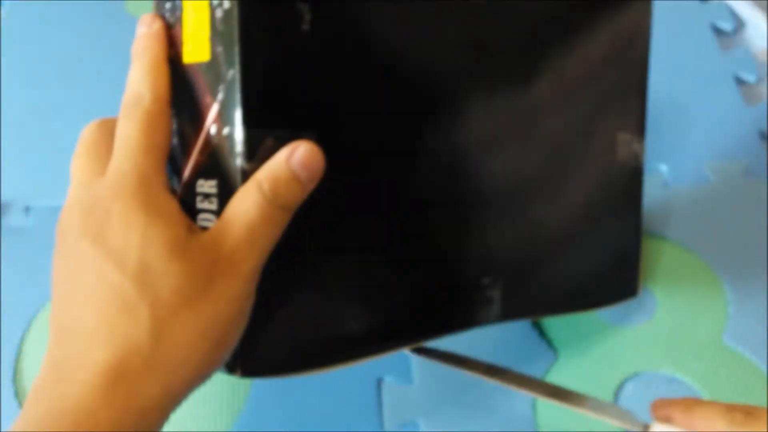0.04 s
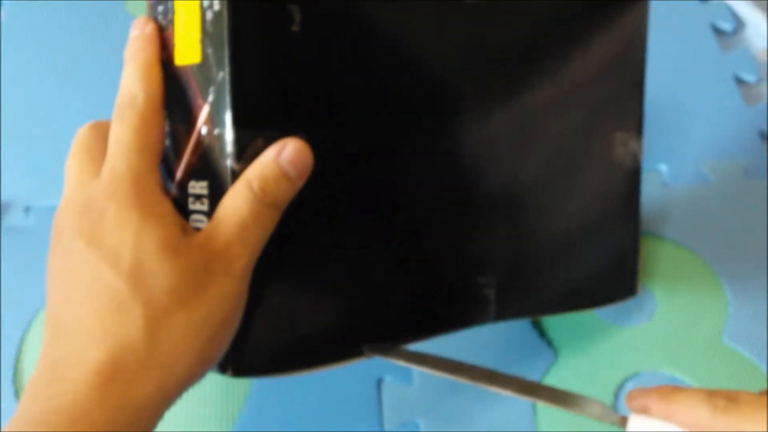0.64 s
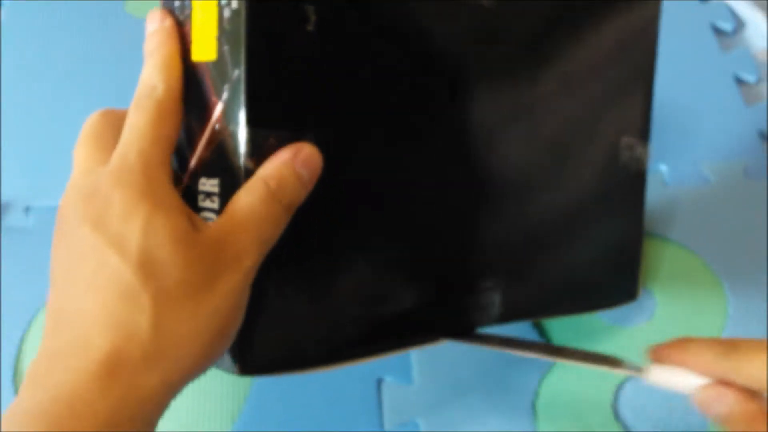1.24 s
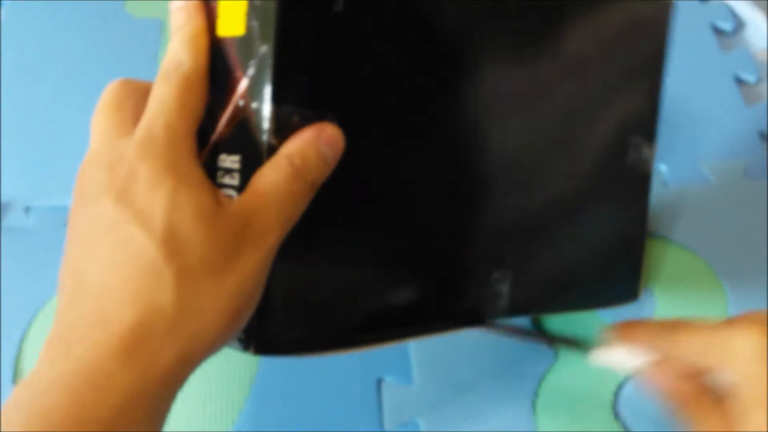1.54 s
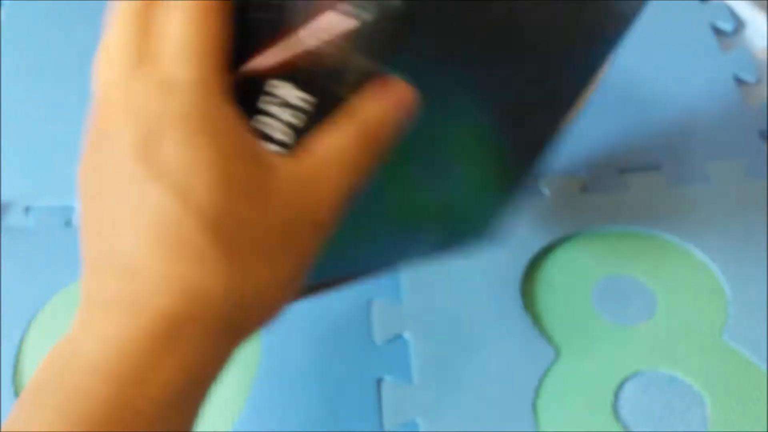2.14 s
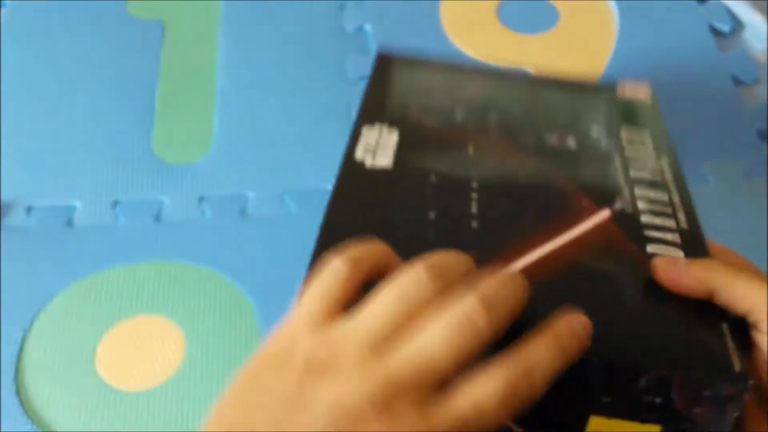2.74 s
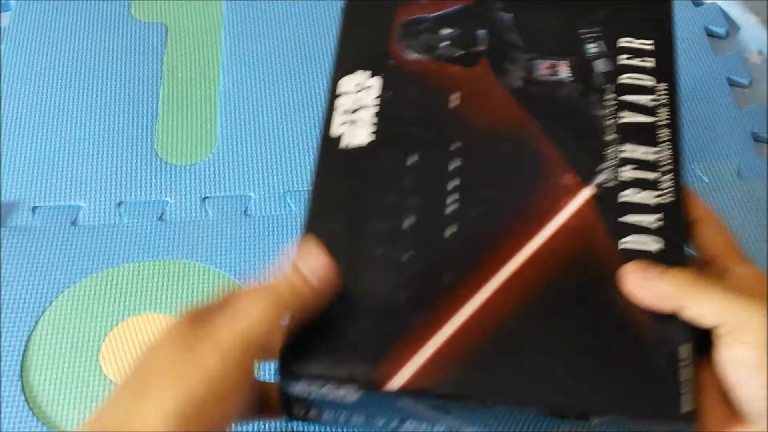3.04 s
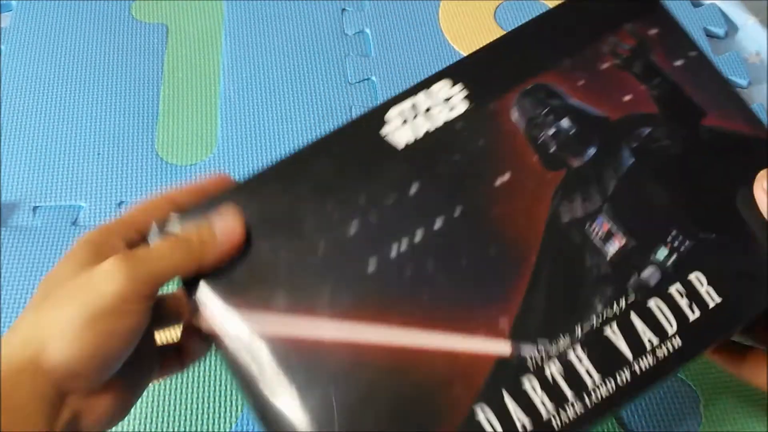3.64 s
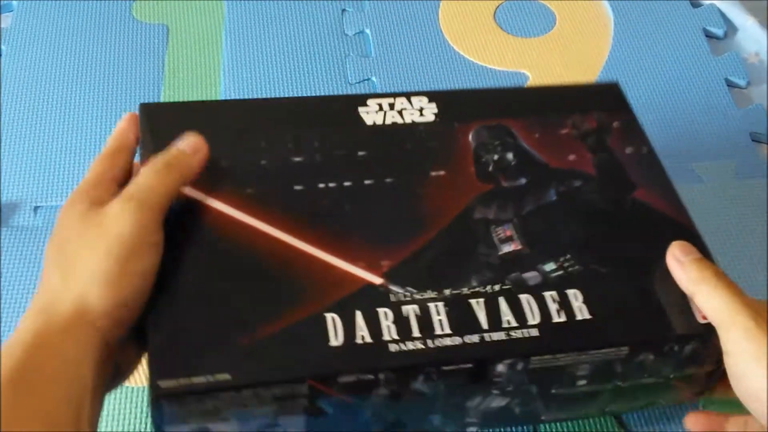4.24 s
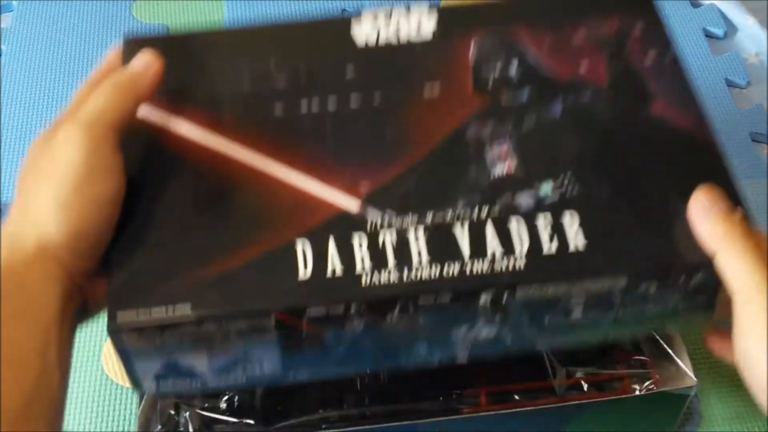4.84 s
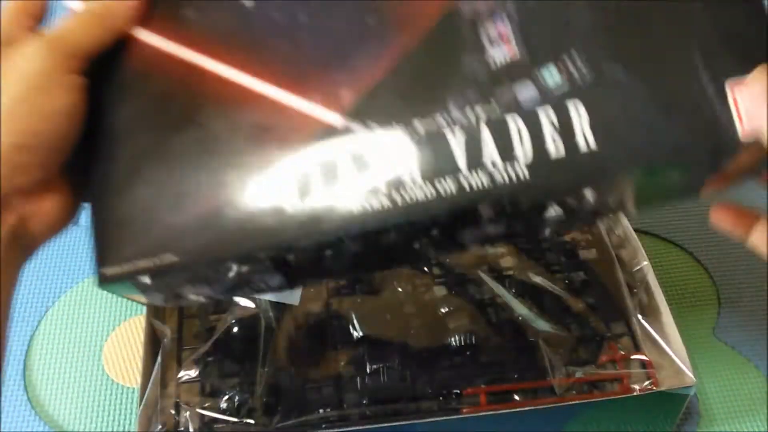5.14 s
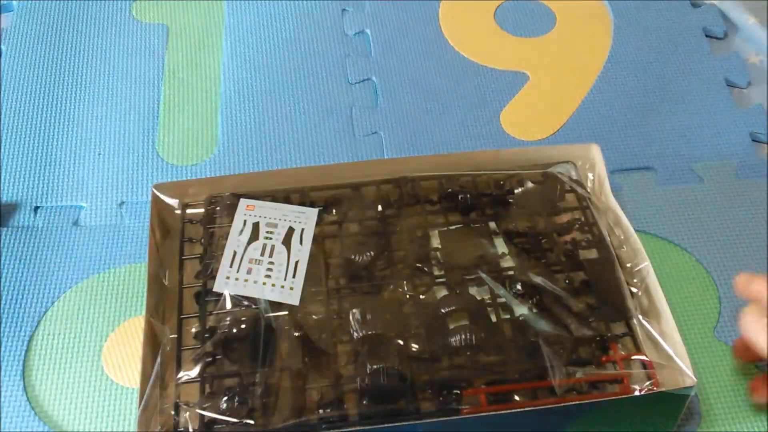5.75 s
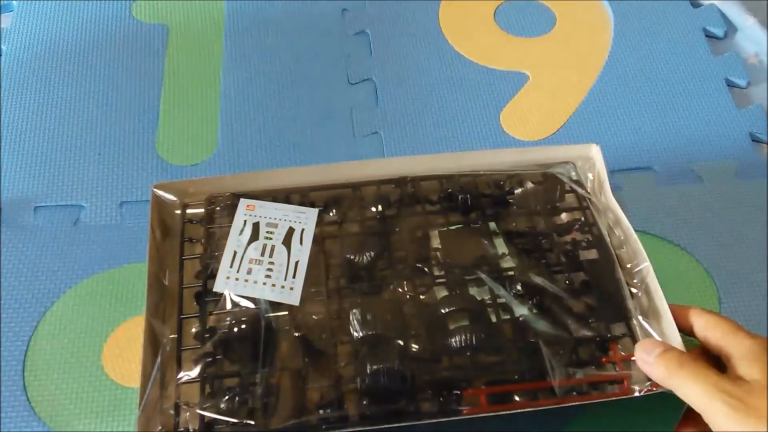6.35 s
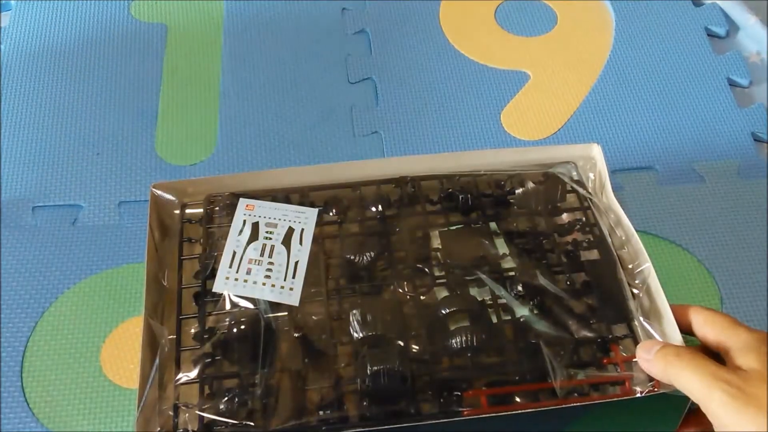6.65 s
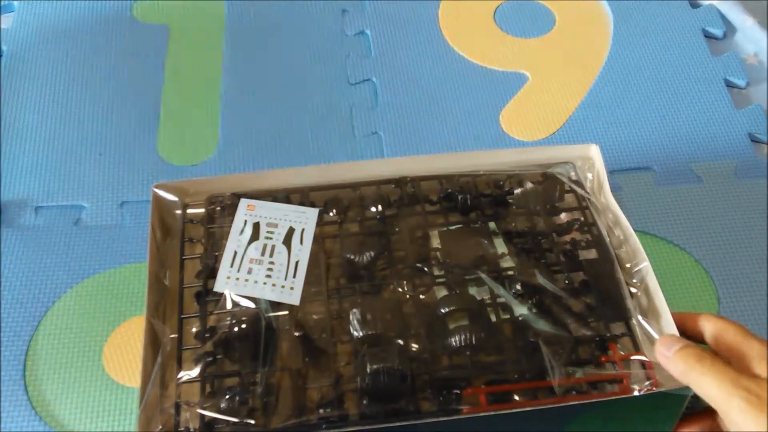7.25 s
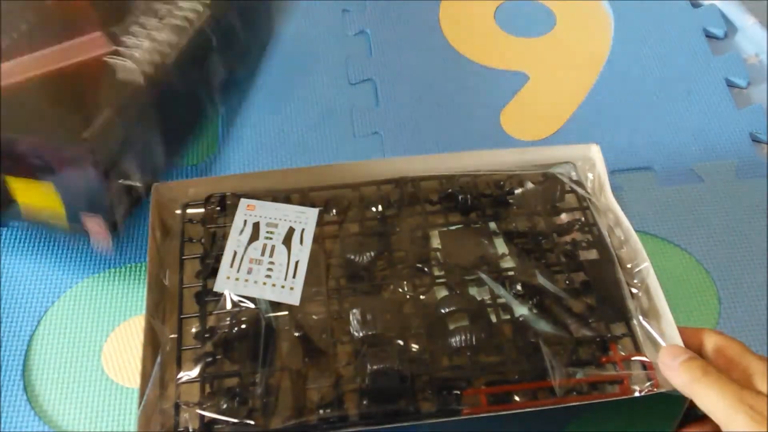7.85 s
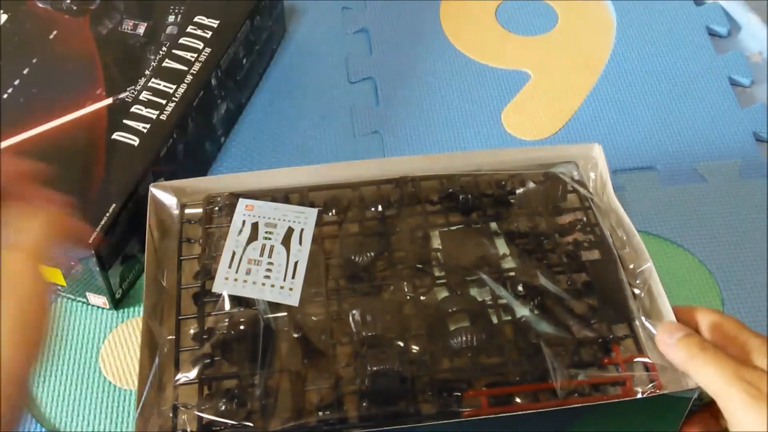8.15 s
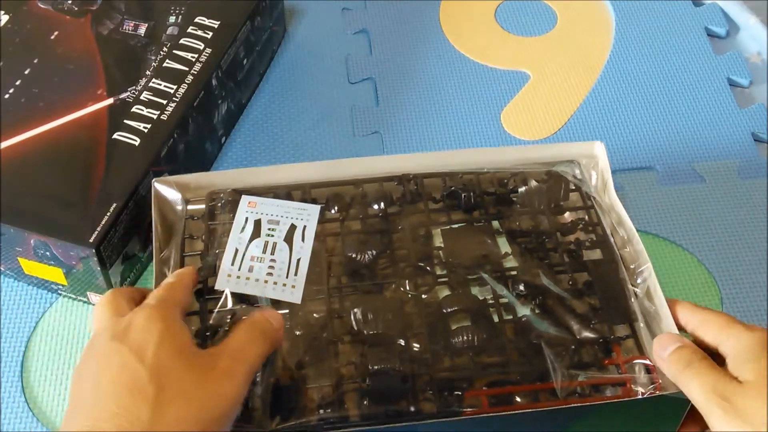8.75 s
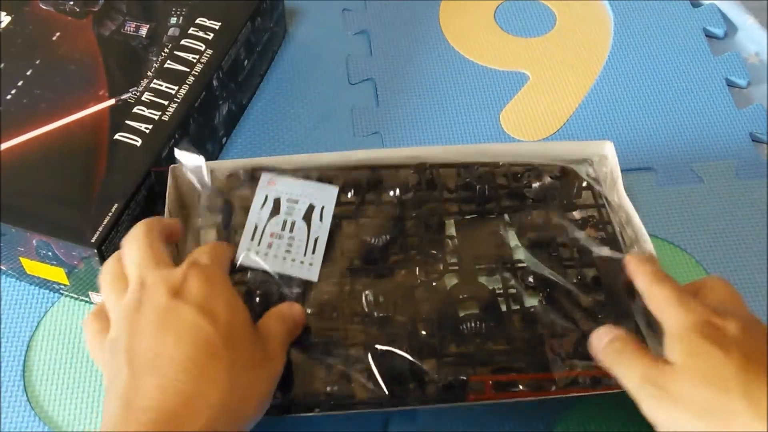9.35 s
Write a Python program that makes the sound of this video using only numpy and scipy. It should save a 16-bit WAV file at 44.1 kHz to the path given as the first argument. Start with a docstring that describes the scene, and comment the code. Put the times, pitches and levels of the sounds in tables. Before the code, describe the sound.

The sounds are close to the microphone in a small room with faint steady background noise. A few light ticks on cardboard open the scene. From about 1 second a knife rasps through the box's seal in short, growing strokes with a faint steely edge, ending in a sharp snap at 1.8 seconds. Between 2 and 4 seconds hands rub and tap the hollow box while turning it, with a firmer knock near 3.8. From 4.3 seconds the tight lid drags up the walls and pops free at about 5. Soft rubs and taps fade into a lull, broken by a few knocks around 7 seconds. Just after 8 seconds the lid topples onto a foam mat with a quick cluster of hollow thuds, the loudest moment. From 8.5 seconds fingers press a thin plastic bag, its dry, bright crackles thickening until about 9.5.

```python
"""Opening a cardboard box

On a foam mat in a small room, close to the microphone, a knife rasps through the seal of a box.
Hands rub and tap the card as they turn it over; the tight lid drags up the walls and pops free.
The lid is set aside and topples with a hollow thud; then fingers press the crackling plastic bag inside.
Rubbing is a stream of tiny slips, knocks are cracks that ring the panels, and the hollow box rings on."""
import sys
import numpy as np
from scipy import signal
from scipy.fft import rfft, irfft
from scipy.io import wavfile
from scipy.ndimage import uniform_filter1d

SR = 44100
rng = np.random.default_rng(int(sys.argv[2]) if len(sys.argv) > 2 else 0)


def to_wav(s):
    """Save 16-bit WAV."""
    ch = np.atleast_2d(s).T  # columns
    pcm = np.round(np.clip(ch, -1, 1) * 32767)  # PCM
    wavfile.write(sys.argv[1], SR, pcm.astype(np.int16))


N = 418509
TIME = np.arange(N) / SR
LEAD_S = 512 / SR  # build-up time allowed before each blow

# Levels are relative. Body is a boost below about 800 Hz, hiss a boost above about 5 kHz.
# Each row: time in seconds, level in dB, body in dB, hiss in dB, rise in ms, resonance in Hz.
CARD_TAPS = [(0.3566, -40.5, -10, 4, 0.35, 4580), (0.5875, -37, 0, -1, 2.3, 620),
             (0.7083, -48.5, 8, -10, 0.5, 340), (0.9503, -51.5, 1.5, -35, 1.2, 676),
             (1.0394, -42.5, 3, -3, .9, 2930), (1.592, -46, -8, 19, 0.17, 1230),
             (1.8008, -21.5, 1, 6.5, .6, 2060), (2.084, -50.5, -5, -17, 0.77, 1440),
             (2.1884, -42.5, -14, -10, 0.48, 1210), (2.2417, -39.5, -8, 4.5, .8, 1710),
             (2.398, -41.5, -6, -4, 0.17, 940), (2.5884, -54, -9, 8, 0.26, 1650),
             (2.8359, -41.5, 0, -8.5, .65, 770), (2.8563, -36.5, 5, -12.5, .25, 720),
             (2.8803, -33, 0.5, 1.5, 0.46, 845), (2.944, -41.5, -15, 8.5, 0.18, 1130),
             (2.9652, -35.5, 2, 10.5, 0.24, 900), (2.9731, -31.5, 8, -3, 2.1, 1890),
             (3.1708, -60.5, -10, 19, .2, 620), (3.2915, -29.5, -12, 1, 0.25, 840),
             (3.3592, -29, -6, -5, 0.25, 630), (3.403, -37.5, -2, -1, 0.26, 870),
             (3.4413, -28.5, -1.5, -4, 2.1, 4080), (3.537, -26.5, 1.5, -0.5, 1.26, 3940),
             (3.812, -25, -7, 0, .8, 1900), (3.8201, -20.5, 3, 6, 0.35, 464),
             (3.922, -37, -10, -3, 0.21, 4060), (4.1062, -48.5, -11, 7, .25, 1140),
             (4.751, -50, -18, 16, 0.58, 2350), (4.3089, -36, -1.5, -31, 0.15, 1050),
             (4.4033, -35.5, -1.5, -16, 0.57, 475), (4.5113, -39.5, -14, 3, 1, 1210),
             (4.9214, -29, -2.5, -30, 0.14, 580), (4.9614, -17.5, -2.5, -7.5, 2.1, 558),
             (5.17, -34.5, -10.5, -14, 0.66, 1370), (5.226, -40.5, -13, -17, .7, 1240),
             (5.2917, -34, -3, -8.5, .6, 790), (5.3832, -37, -10, -6, 1.7, 558),
             (6.481, -58, 4.5, -2.5, 0.46, 1010), (6.665, -44.5, -26, -25, 0.093, 1890),
             (6.9715, -28.5, -3, -5.5, 0.37, 605), (7.0789, -40, 5, -1, 2.5, 393),
             (7.112, -39.5, 2, -25, 0.45, 547), (7.303, -41, 5, -21, 2.1, 790),
             (8.0479, -29, 5.5, -5, 1.06, 1066), (8.0821, -35.5, 13, -10, .2, 473),
             (8.0941, -21, 8.5, -10, 2.1, 497), (8.126, -28, 0, -3, 4, 540),
             (8.1827, -29.5, 11, -5.5, 1.5, 570), (8.2104, -25, 11.5, -13.5, 0.083, 436)]
# Each row: frequency in Hz, panel T60 in seconds.
PANEL_T60 = [(300, 0.1), (1200, 0.12), (4000, 0.026), (12000, 0.0042)]


def taps():
    """Each blow on the card is a crack followed by the short dense ring of the panels."""
    out = np.zeros(N)
    for time_s, db, body_db, hiss_db, rise_ms, hz in CARD_TAPS:
        force = np.zeros(SR // 8)
        add(force, 0, crack(rise_ms, fall_ms=0.9))
        add(force, LEAD_S, amp(-2) * tail(PANEL_T60, size=4096))
        resonances = spot_gains(hz, overtone=1.95, peak_db=10.5, width_hz=110, uneven_db=2)
        add(out, time_s - LEAD_S, blow(force, db, body_db, hiss_db, resonances))
    return high_pass(out, hz=105.6, order=2)


# Each row: time in seconds, level in dB, pitch in Hz.
MAT_SLAPS = [(2.878, -44, 140), (2.976, -33, 195), (3.702, -45, 230), (3.819, -31.5, 280),
             (6.975, -37.5, 260), (7.077, -28, 227), (7.118, -32.5, 170), (8.082, -14, 470),
             (8.0945, -8.5, 500), (8.1262, -8, 595), (8.181, -16, 324), (8.212, -4, 725),
             (9.454, -31.5, 100)]


def thuds():
    """A flat face pushes out the air under it in one damped swing, then rebounds softer and lower."""
    out = np.zeros(N)
    t = np.arange(2048) / SR - LEAD_S
    for time_s, db, hz in MAT_SLAPS:
        for delay_s, bounce_db, pitch_ratio in ((0, 0, 1), (0.011, -14, 0.62)):
            cycles = hz * pitch_ratio * t
            swing = np.cos(2 * np.pi * cycles) * np.exp(-(cycles / 0.4) ** 2)
            add(out, time_s + delay_s - LEAD_S, amp(db + bounce_db) * swing)
    return high_pass(out, hz=120, order=3)


# Each row: start in seconds, length in seconds, level in dB, body in dB, hiss in dB.
SEAL_CUTS = [(1.03, 0.12, -60, 4, 1.5), (1.14, 0.16, -41.5, -12.5, -1.5), (1.28, 0.054, -35, -11, 5),
             (1.385, 0.14, -35.5, -9, -4), (1.58, 0.1, -30, -4.5, 0), (1.789, 0.05, -21, 0, 1.5),
             (1.92, .09, -50, 2, 3)]
# Each row: frequency in Hz, width in Hz, level in dB.
STEEL_MODES = [(3130, 540, 2), (5810, 350, -2.5), (8250, 540, -8)]


def knife():
    """The blade rasps through the seal and its steel sings faintly along."""
    db, body_db, hiss_db = stroke_controls(SEAL_CUTS, attack_share=0.27, swell_db=1, release_s=0.02)
    rasp = friction(db, body_db, hiss_db, slips_per_s=2500, spread_db=-1.5, smooth=0.85,
                    judder_db=2, judder_hz=120, patchy_db=3)
    steel = sum(amp(mode_db) * signal.lfilter(*signal.iirpeak(hz, hz / width_hz, fs=SR), rasp)
                for hz, width_hz, mode_db in STEEL_MODES)
    cut = high_pass(amp(-2) * (rasp + 0.38 * steel), hz=267.3, order=4)
    return cut + rocking(db - 39, band_hz=(75, 150))


# Each row: start in seconds, length in seconds, level in dB, body in dB, hiss in dB.
CARD_RUBS = [(2.165, 0.028, -46, -5, 4), (2.222, .045, -43.5, -7, -3), (2.345, 0.091, -56, 3, 1),
             (2.48, 0.2, -61, -6, 1), (2.823, 0.07, -38, 0, -10.5), (2.96, 0.032, -37.5, 6, -4.5),
             (3.03, 0.095, -62, 7, -3), (3.281, 0.022, -34.5, 3, -4), (3.355, 0.097, -44, -3, -2.5),
             (3.56, 0.11, -52.5, -2, 3), (3.67, 0.022, -43, -3, 3.5), (3.73, 0.084, -55, 0, 12),
             (3.775, 0.044, -36, -1, -0.5), (3.805, 0.021, -26.5, -7, 3), (3.86, 0.23, -47, -4, -8),
             (4.145, 0.031, -47.5, -5, -7), (4.18, 0.11, -61, 1, -1), (5.0, 0.46, -58, 0, 0),
             (5.45, 0.23, -66, 4.5, -4.5), (5.7, 0.2, -68, 5, 5.5), (6.885, 0.21, -56, -2, -19.5),
             (7.057, 0.068, -48.5, 12.5, -2), (7.25, .035, -52, -1, -4), (7.283, 0.033, -49.5, 2, -5.5),
             (7.42, 0.035, -68, 14, 0), (7.98, 0.06, -59, 12, -18), (8.035, 0.044, -41, 11, -9),
             (8.085, 0.15, -41, 22.5, -8)]


def rubbing():
    """Hands rub the card and the card rubs the mat."""
    db, body_db, hiss_db = stroke_controls(CARD_RUBS, attack_share=0.18, swell_db=1.5, release_s=0.025)
    rub = friction(db, body_db, hiss_db, slips_per_s=1500, spread_db=2.5, smooth=0.51,
                   judder_db=1.2, judder_hz=70, patchy_db=2)
    ticks = catches(db - 1, per_s=12, hiss_db=-0.5)
    return high_pass(rub + ticks, hz=188.8, order=3) + rocking(db - 28.5, band_hz=(60, 140))


# Each row: time in seconds, level in dB.
LID_DRAG = [(4.28, -66), (4.35, -44), (4.58, -40.5), (4.83, -37), (4.885, -42.5), (4.97, -31), (5.06, -68)]


def lid_slide():
    """The tight lid drags up the walls of the box until it comes free."""
    db = np.interp(TIME, *np.transpose(LID_DRAG), left=-120, right=-120)
    drag = friction(db, body_db=np.full(N, -7), hiss_db=np.full(N, -3.5), slips_per_s=1100, spread_db=2,
                    smooth=0.79, judder_db=1.76, judder_hz=59.2, patchy_db=2)
    return high_pass(drag, hz=301.4, order=4)


# Each row: start in seconds, length in seconds, start pitch in Hz, end pitch in Hz, width in Hz,
# level in dB.
CARD_RESONANCES = [(1.111, 0.2, 2990, 3150, 352, -51), (1.143, 0.087, 5800, 6100, 430, -54),
                   (1.227, 0.16, 1500, 621, 300, -55.5), (1.384, 0.13, 2400, 2597, 1216, -46),
                   (1.596, 0.072, 2103, 770, 486, -36.5), (1.65, 0.1, 624, 382, 189.5, -40),
                   (4.094, .09, 12200, 13200, 330, -69), (4.21, 0.11, 12700, 14000, 297, -67),
                   (4.401, 0.33, 998.5, 1295, 449, -46), (4.658, 0.19, 1200, 1607, 698, -47),
                   (6.881, 0.031, 2150, 2070, 130, -57.5), (7.056, 0.068, 2860, 2820, 130, -60),
                   (8.112, 0.041, 616, 572, 170, -22)]


def card_resonances():
    """Card sings in gliding, wavering tones as it is scraped, and the lid drums as it lands."""
    out = np.zeros(N)
    for start_s, length_s, start_hz, end_hz, width_hz, db in CARD_RESONANCES:
        size = round(length_s * SR)
        pole = np.exp(-np.pi * width_hz / SR)
        noise = rng.standard_normal(size) + 1j * rng.standard_normal(size)
        flutter = signal.lfilter([1], [1, -2 * pole, pole ** 2], noise)
        waver = np.interp(np.arange(size), np.linspace(0, size, 8), rng.standard_normal(8))
        hz = np.geomspace(start_hz, end_hz, size) + 0.4 * width_hz * waver
        carrier = np.exp(2j * np.pi * np.cumsum(hz) / SR)
        add(out, start_s, amp(db) * unit_rms((flutter * carrier).real) * signal.windows.tukey(size, 0.5))
    return high_pass(out, hz=264, order=4)


# Each row: start in seconds, length in seconds, level in dB, body in dB, hiss in dB.
BAG_SQUEEZES = [(8.474, 0.048, -38, -1.5, -4), (8.577, 0.035, -39.5, -3.5, 1.5),
                (8.887, 0.31, -50, -3.5, -6), (9.198, 0.074, -36, -0.5, -6), (9.293, 0.11, -27, -1.5, -16),
                (9.425, 0.11, -28.5, -6, -2)]


def bag_crinkle():
    """Fingers squeeze the bag; its thin film crinkles and radiates no bass."""
    db, body_db, hiss_db = stroke_controls(BAG_SQUEEZES, attack_share=0.086, swell_db=-4, release_s=0.025)
    crinkle = friction(db, body_db, hiss_db, slips_per_s=660, spread_db=1.5, smooth=0.69,
                       judder_db=3, judder_hz=155, patchy_db=-1.5)
    ticks = catches(db - 2, per_s=26, hiss_db=7)
    return high_pass(crinkle + ticks, hz=398, order=3)


# Each row: time in seconds, level in dB, body in dB, hiss in dB, rise in ms, resonance in Hz.
CREASE_SNAPS = [(8.489, -26.5, -20, 15.5, 0.16, 1050), (8.4988, -27.5, 3, 8, 1.7, 670),
                (8.5849, -27, -5.5, 9, 1.5, 650), (8.6039, -28.5, -27, 4, .2, 2730),
                (8.8335, -50, -24, 9.5, 0.29, 2650), (8.8998, -38, 0, 2.5, 5.1, 1030),
                (8.931, -36.5, -16, 10, .15, 4400), (9.1066, -29.5, -21, -1, 0.53, 2100),
                (9.211, -19.5, -5, 13.5, 0.26, 2420), (9.2522, -22.5, -16, 3.5, .2, 4200),
                (9.3111, -23, 1, 12, 0.94, 3920), (9.3519, -21, -1, 14, 0.28, 5960),
                (9.3632, -17.5, -23, 3, 0.22, 4580), (9.37, -15.5, -1.5, 10.5, 1.4, 4750),
                (9.4182, -25.5, -22, 12, .2, 5900), (9.4362, -16.5, -13, 6, .2, 2520),
                (9.456, -13.5, -2.5, 7, 0.25, 4050), (9.4677, -23.5, -12, 12, .2, 930)]


def bag_snaps():
    """Creases of the bag flip with a dry, bright crack."""
    out = np.zeros(N)
    for time_s, db, body_db, hiss_db, rise_ms, hz in CREASE_SNAPS:
        resonances = spot_gains(hz, overtone=1.91, peak_db=11.5, width_hz=96, uneven_db=4)
        force = crack(rise_ms, fall_ms=0.66)
        add(out, time_s - LEAD_S, blow(force, db, body_db, hiss_db, resonances))
    return high_pass(out, hz=363, order=2)


def stroke_controls(rows, attack_share, swell_db, release_s):
    """Each stroke grips, swells or eases, and lets go; gives level, body and hiss in dB over time."""
    power, body, hiss = np.zeros((3, N))
    for start_s, length_s, db, body_db, hiss_db in rows:
        t = TIME - start_s
        grip = np.clip(t / (attack_share * length_s), 0, 1)
        release = np.exp(-np.maximum(t - length_s, 0) / release_s)
        pressure_db = swell_db * (np.clip(t / length_s, 0, 1) - 1)
        stroke_power = (grip * release * amp(db + pressure_db)) ** 2
        power += stroke_power
        body += stroke_power * body_db
        hiss += stroke_power * hiss_db
    power += 1e-14
    return 10 * np.log10(power), body / power, hiss / power


def friction(db, body_db, hiss_db, slips_per_s, spread_db, smooth, judder_db, judder_hz, patchy_db):
    """Tiny slips of uneven size over a smooth hiss; the stroke judders and its resonances wander."""
    slip_index = (TIME * slips_per_s).astype(int)
    slips = rng.standard_normal(N) * amp(spread_db * np.minimum(rng.exponential(1, N), 4))[slip_index]
    judder = unit_rms(signal.lfilter(*signal.butter(2, judder_hz, fs=SR), rng.standard_normal(N)))
    force = unit_rms((unit_rms(slips) + smooth * rng.standard_normal(N)) * amp(judder_db * judder))
    hz, t, spectra = signal.stft(force, SR, nperseg=512, noverlap=384)
    patches = uniform_filter1d(rng.standard_normal(spectra.shape), size=6, axis=0)
    patches = unit_rms(uniform_filter1d(patches, size=18, axis=1))
    colour = sheet_colour(hz[:, None], np.interp(t, TIME, body_db), np.interp(t, TIME, hiss_db))
    spectra *= colour * amp(patchy_db * patches)
    return amp(db) * signal.istft(spectra, SR, nperseg=512, noverlap=384)[1][:N]


def catches(db, per_s, hiss_db):
    """Now and then a rubbing surface catches and ticks."""
    impulses = (rng.random(N) < per_s / SR) * rng.uniform(0.4, 1, N) * amp(db)
    tick = crack(rise_ms=0.32, fall_ms=1)[round(LEAD_S * SR):]
    return blow(signal.oaconvolve(impulses, tick), db=0, body_db=-6.5, hiss_db=hiss_db, resonances=0.98)[:N]


def rocking(db, band_hz):
    """A stroke rocks the whole box on the soft mat with a low rumble."""
    rumble = signal.lfilter(*signal.butter(2, band_hz, "band", fs=SR), rng.standard_normal(N))
    return amp(db) * unit_rms(rumble)


def crack(rise_ms, fall_ms, size=2048):
    """Contacts give way faster and faster up to a crack at LEAD_S; unit energy."""
    ms = (np.arange(size) / SR - LEAD_S) * 1000
    rise_ms = max(rise_ms, 0.1)
    envelope = np.exp(np.where(ms < 0, -(ms / (1.77 * rise_ms)) ** 2, -ms / (fall_ms + 1.4 * rise_ms)))
    burst = rng.standard_normal(size) * envelope
    power = uniform_filter1d(abs(rfft(burst)) ** 2, size=9)
    flattening = minimum_phase((abs(power) + 1e-9) ** -0.3)
    force = signal.fftconvolve(burst, flattening)[:size]
    return force / np.linalg.norm(force)


def spot_gains(low_hz, overtone, peak_db, width_hz, uneven_db):
    """One spot on a sheet has two main resonances among many chance ones."""
    hz = bin_hz(4096)
    peaks = sum(share / (1 + ((hz - peak_hz) / (width_hz * np.sqrt(peak_hz / 1000))) ** 2)
                for peak_hz, share in ((low_hz, 1), (overtone * low_hz, 0.6)))
    knots_hz = np.linspace(0, np.sqrt(SR / 2), 70) ** 2
    lumps = np.interp(hz, knots_hz, rng.standard_normal(len(knots_hz)))
    return amp(peak_db * (peaks - 0.41) + uneven_db * lumps * np.clip(1 - peaks, 0, 1))


def blow(force, db, body_db, hiss_db, resonances):
    """A force sounds through the sheet and the resonances of the struck spot."""
    response = minimum_phase(sheet_colour(bin_hz(4096), body_db, hiss_db) * resonances)
    return amp(db) * np.sqrt(SR / 100) * signal.fftconvolve(force, response)


# Each row: frequency in Hz, level in dB.
SHEET_SPECTRUM = [(40, -27), (120, -18.5), (300, -3), (600, 1.5), (1200, 1), (3000, -1.5), (6000, -7),
                  (11000, -7.5), (16000, -11)]
# Each row: frequency in Hz, share of the body or hiss boost.
BODY_BAND = [(600, 0.98), (1200, 0.082)]
HISS_BAND = [(3500, 0.04), (6000, 0.91), (15000, 0.98)]


def sheet_colour(hz, body_db, hiss_db):
    """Spectral gains of a struck or rubbed sheet."""
    boost_db = body_db * curve_at(BODY_BAND, hz) + hiss_db * curve_at(HISS_BAND, hz)
    return unit_rms(amp(curve_at(SHEET_SPECTRUM, hz))) * amp(boost_db)


# Each row: frequency in Hz, level in dB, T60 in seconds.
HOLLOW_MODES = [(221, -8.5, 0.13), (284, 3.5, 0.1), (388, -1.5, 0.29), (487, -4, 0.07), (557.2, -5, 0.88),
                (651, -1, 0.17), (772.5, -1, .14), (814, -6.5, 0.24), (870, -10, 0.34), (1128, 4, 0.047),
                (1254, -6.5, 0.49)]


def box_ring(shake):
    """The air and walls of the box ring on after whatever shakes them."""
    t = np.arange(SR // 3) / SR
    ring = np.zeros(len(t))
    for hz, db, t60_s in HOLLOW_MODES:
        unity_peak = 2 * np.log(1000) / (t60_s * SR)
        ring += unity_peak * amp(db - 60 * t / t60_s) * np.cos(2 * np.pi * (hz * t + 0.051))
    return signal.oaconvolve(shake, ring)[:N]


# Each row: frequency in Hz, T60 in seconds.
EARLY_T60 = [(200, 0.055), (600, 0.3), (1500, 0.3), (4000, 0.13), (12000, 0.12)]
# Each row: frequency in Hz, reflection level in dB.
EARLY_LEVELS = [(200, -9), (1000, -13.5), (4000, -13), (12000, -10)]
LATE_LEVELS = [(500, -30.5), (1500, -24), (4000, -18.5), (12000, -15.5)]


def room(direct):
    """A small room: quick dense reflections and a faint, bright, longer tail."""
    late_t60 = [(300, 0.19), (10000, 0.68)]
    response = 0
    for t60, levels in ((EARLY_T60, EARLY_LEVELS), (late_t60, LATE_LEVELS)):
        colour = minimum_phase(amp(curve_at(levels, bin_hz(1024))))
        response += signal.fftconvolve(tail(t60, size=SR * 3 // 4), colour)
    out = np.zeros(N)
    add(out, time_s=0.003, sound=signal.oaconvolve(direct, response))
    return out


def tail(t60_curve, size):
    """Dense reflections, each band dying at its own speed; unit energy."""
    hz, t, spectra = signal.stft(rng.choice([-1., 1.], size), SR, nperseg=256)
    fade = amp(-60 * t / curve_at(t60_curve, hz)[:, None])
    fade /= np.linalg.norm(fade, axis=1, keepdims=True)
    reflections = signal.istft(spectra * fade, SR, nperseg=256)[1][:size]
    return reflections / np.linalg.norm(reflections)


# Each row: frequency in Hz, relative density in dB.
NOISE_SPECTRUM = [(12, -29.5), (20, -5.5), (48, -4), (70, -15.5), (142, -12.5), (277, -9), (310, -3),
                  (388, -10), (718, -2), (923, -9.5), (1480, -8.5), (2320, -14), (4300, -18.5),
                  (16000, -25.5)]


def background(rms_db=-66.5):
    """Steady faint noise of the room and the microphone."""
    spectrum = rfft(rng.standard_normal(N)) * amp(curve_at(NOISE_SPECTRUM, bin_hz(N)))
    return amp(rms_db) * unit_rms(irfft(spectrum, N))


def amp(db):
    return 10 ** (db / 20)


def unit_rms(x):
    return x / np.sqrt(np.mean(abs(x) ** 2) + 1e-20)


def curve_at(points, hz):
    """Interpolates on a log-frequency axis."""
    knots_hz, values = np.transpose(points)
    return np.interp(np.log(hz + 1), np.log(knots_hz + 1), values)


def bin_hz(size):
    return np.fft.rfftfreq(size, 1 / SR)


def add(mix, time_s, sound):
    part = mix[max(round(time_s * SR), 0):][:len(sound)]
    part += sound[:len(part)]


def minimum_phase(gains):
    """Impulse response with these gains and the sharpest possible start."""
    cepstrum = irfft(np.log(np.maximum(gains, 1e-5)))
    cepstrum[1:] *= 2
    cepstrum[len(cepstrum) // 2:] = 0
    return irfft(np.exp(rfft(cepstrum)))


def high_pass(x, hz, order):
    return signal.sosfilt(signal.butter(order, hz, "high", fs=SR, output="sos"), x)


def scene():
    """The handling sounds, the ring of the box and the room, in mono."""
    handling = knife() + rubbing() + lid_slide() + bag_crinkle() + card_resonances() + taps()
    slaps = thuds()
    ring = box_ring(amp(-4.5) * handling + amp(-5.5) * slaps)
    direct = handling + slaps + bag_snaps() + ring
    return (amp(-2.38) * direct + room(direct) + background())[None]


def record(dry):
    """The microphone clips at full scale and passes sound up to 16 kHz."""
    low_pass = signal.firwin(401, 16000, window=("kaiser", 8), fs=SR)
    return signal.oaconvolve(np.clip(dry, -1, 1), low_pass[None], "same")


dry = scene()
out = record(dry)
to_wav(out)
```